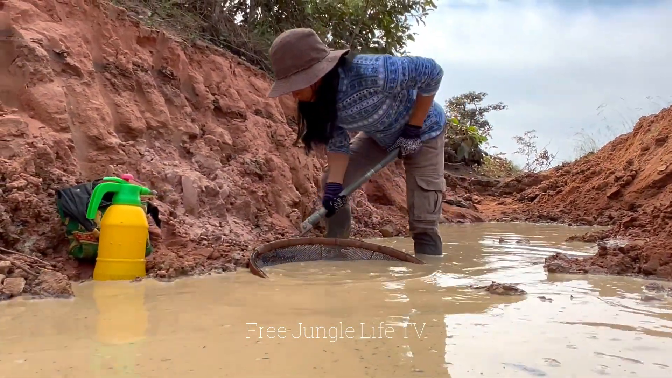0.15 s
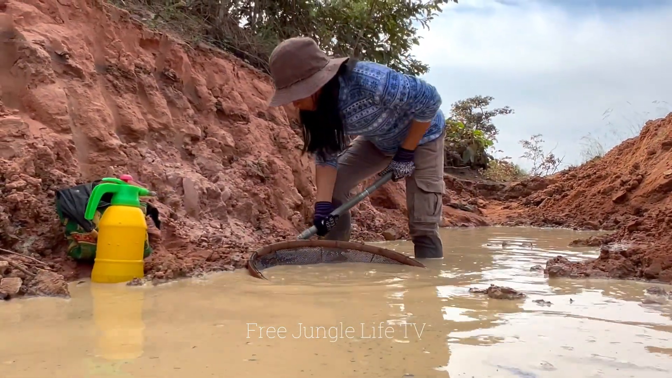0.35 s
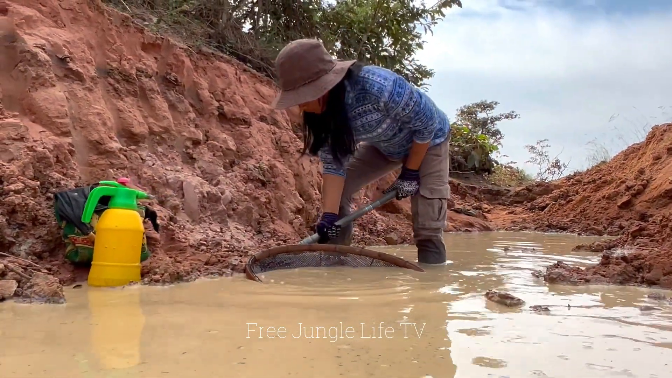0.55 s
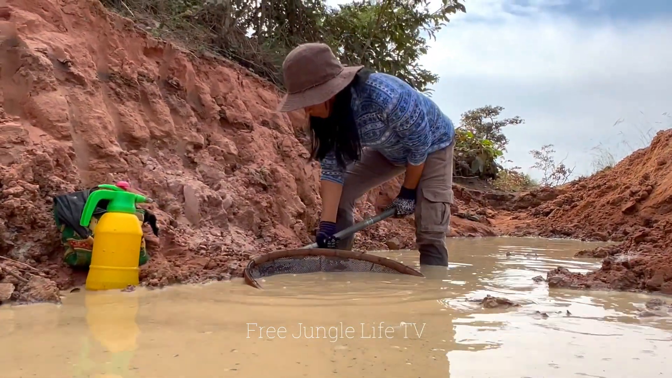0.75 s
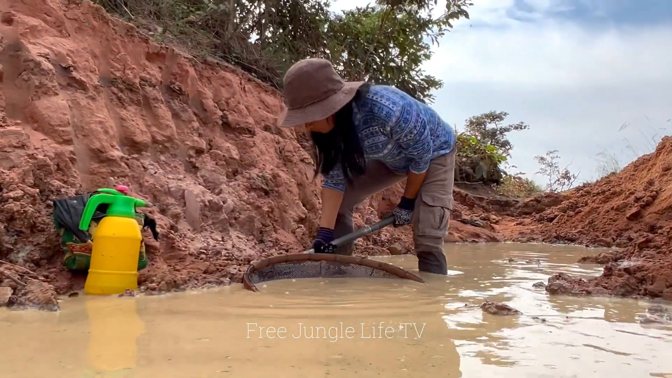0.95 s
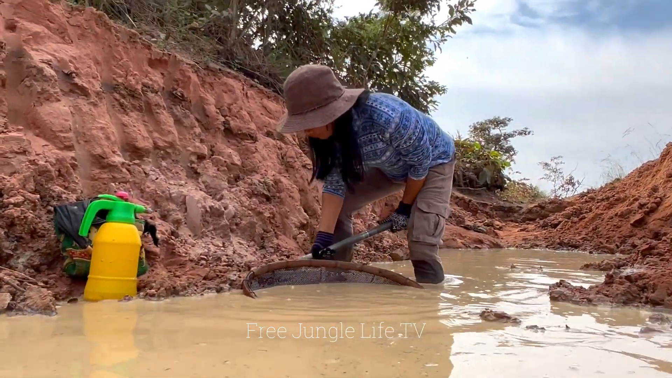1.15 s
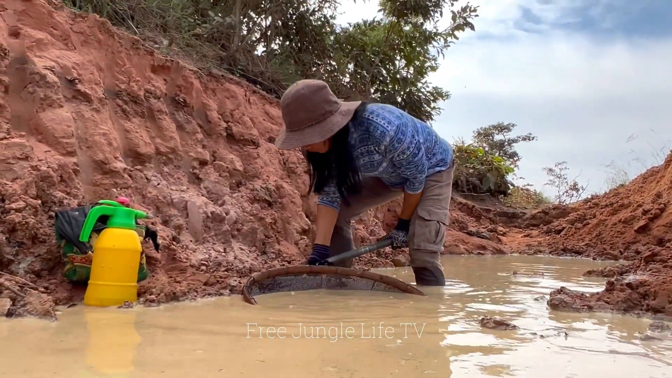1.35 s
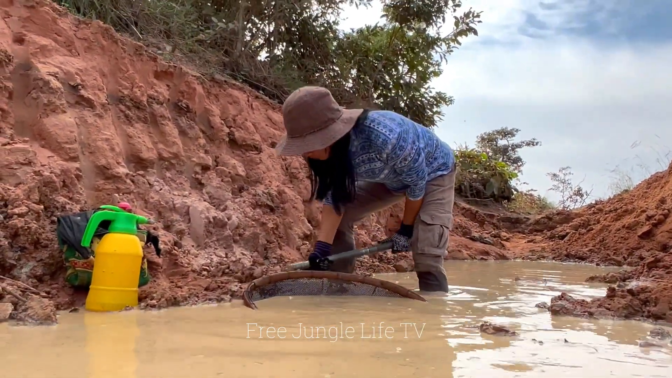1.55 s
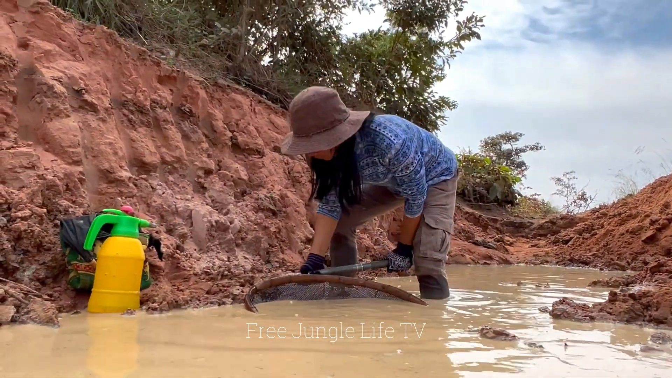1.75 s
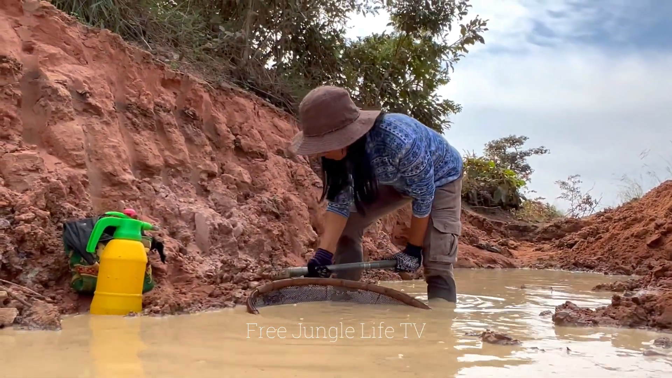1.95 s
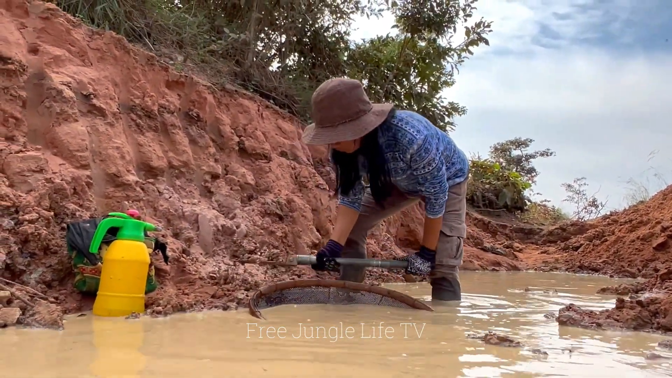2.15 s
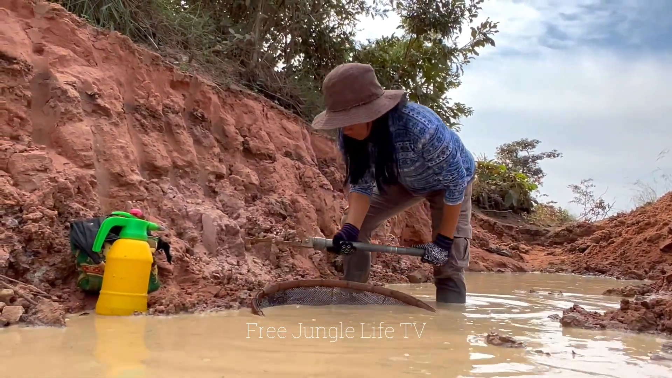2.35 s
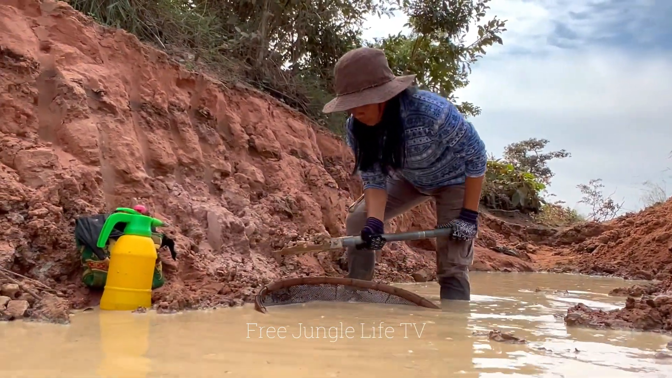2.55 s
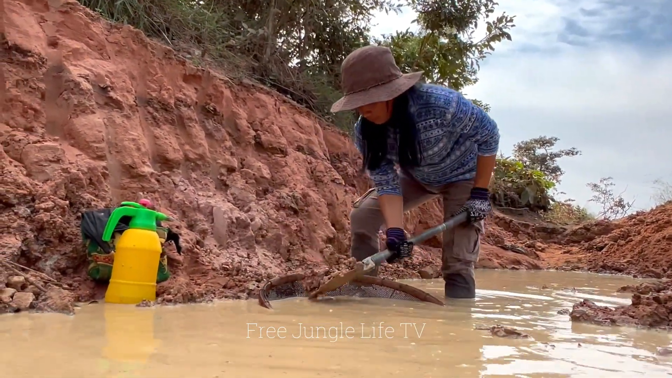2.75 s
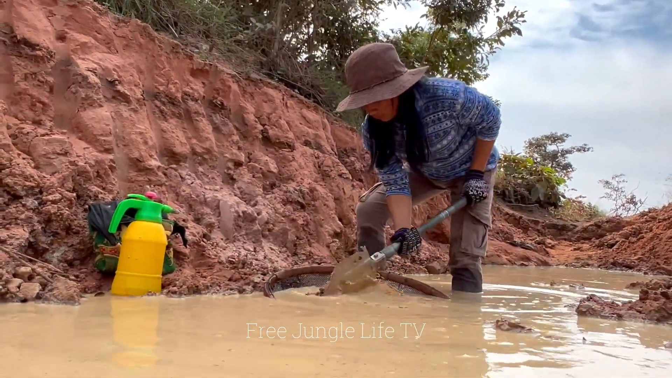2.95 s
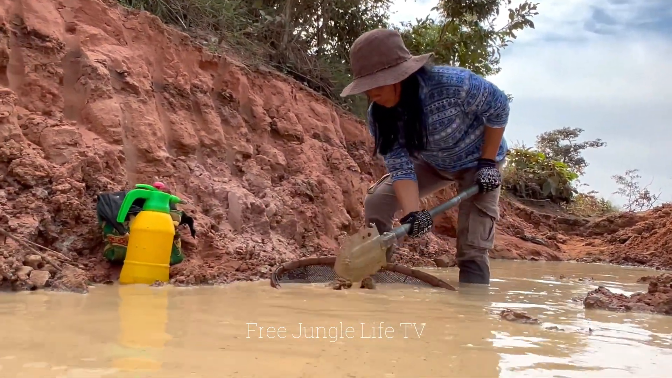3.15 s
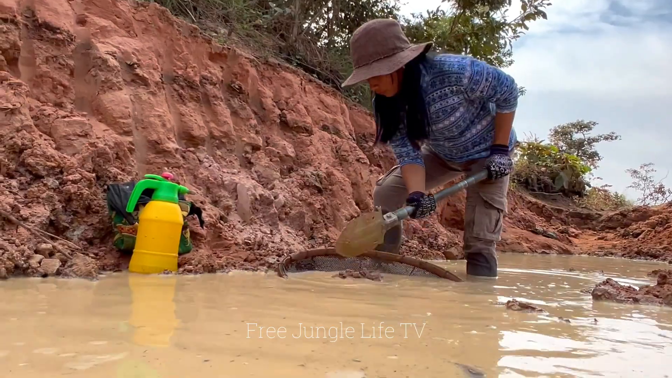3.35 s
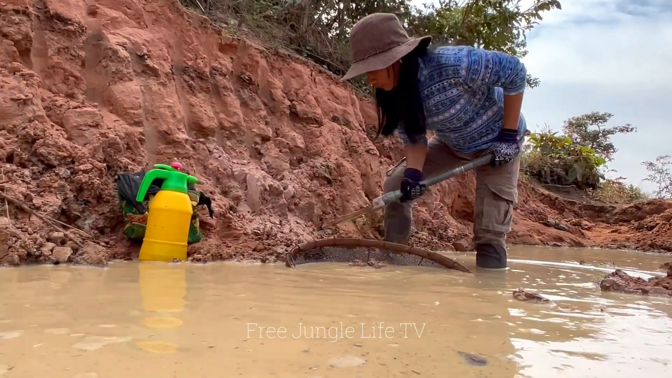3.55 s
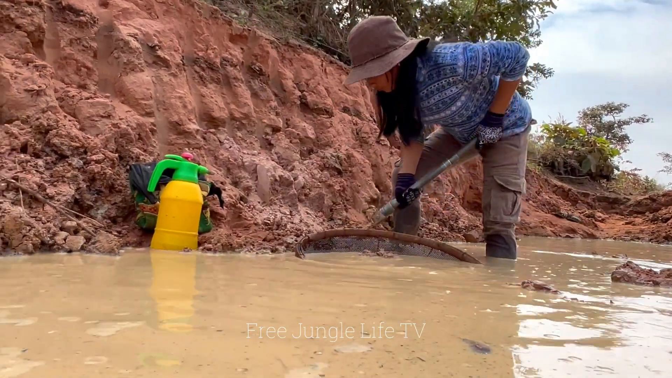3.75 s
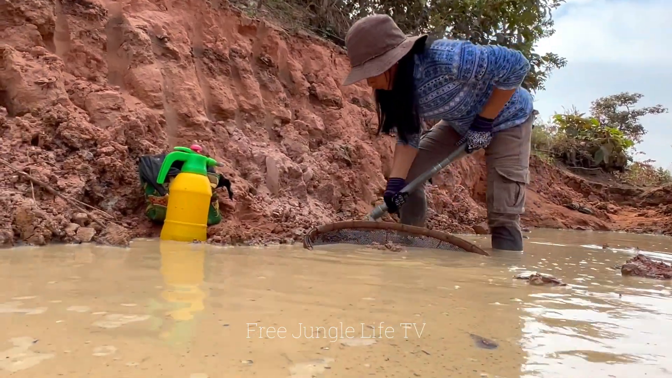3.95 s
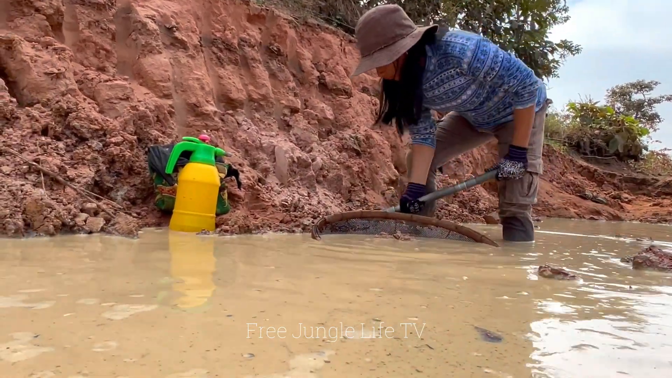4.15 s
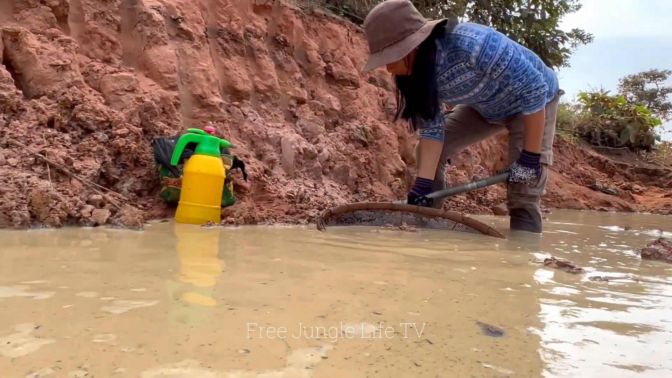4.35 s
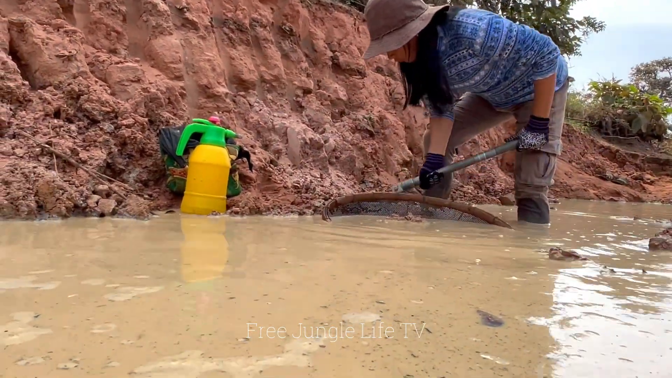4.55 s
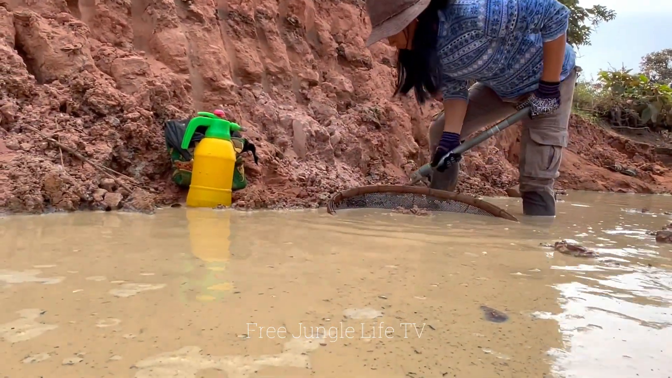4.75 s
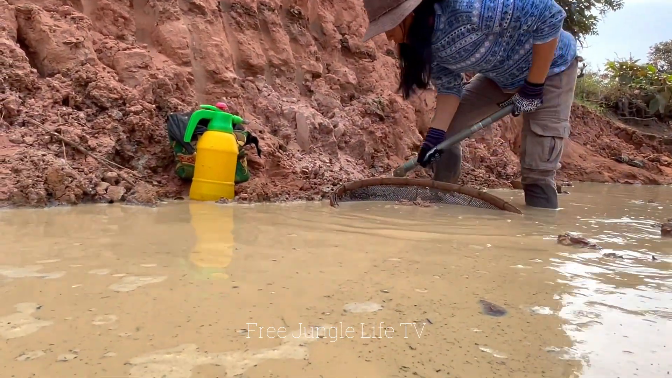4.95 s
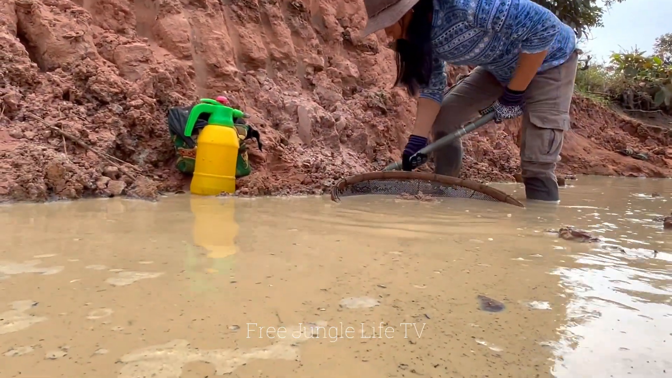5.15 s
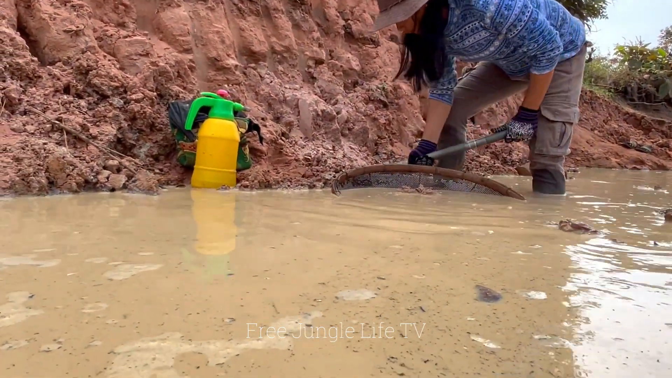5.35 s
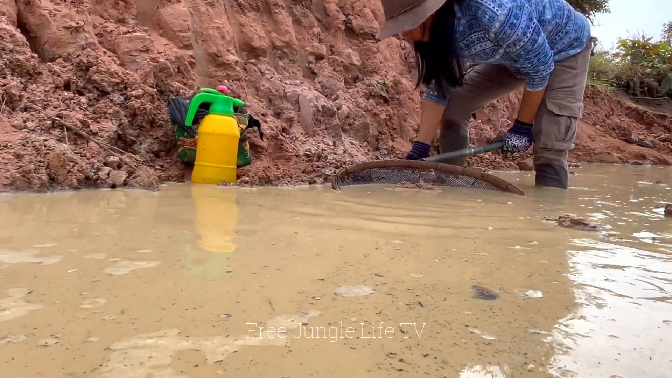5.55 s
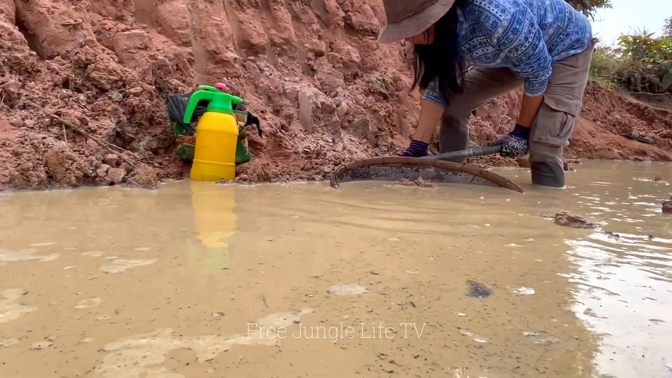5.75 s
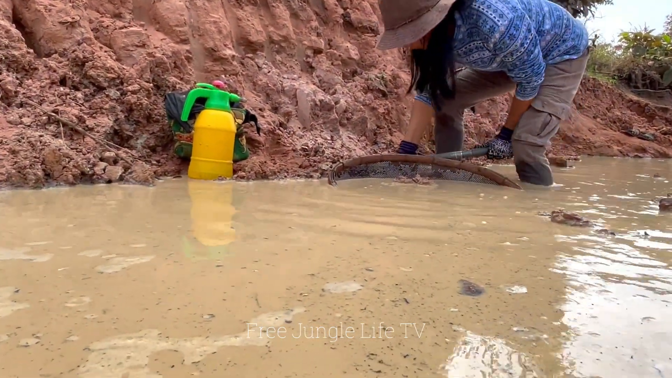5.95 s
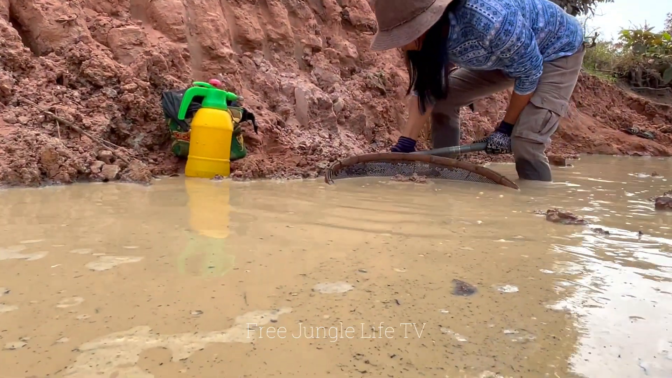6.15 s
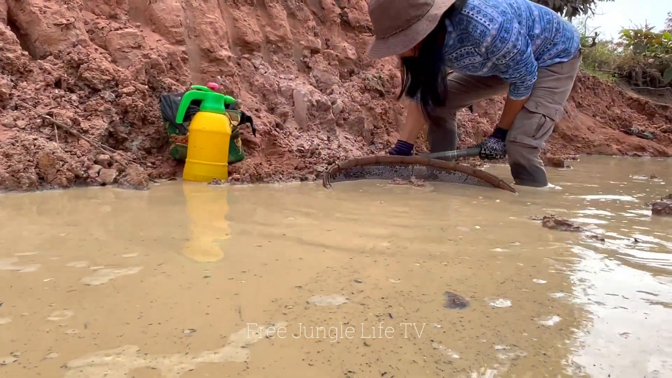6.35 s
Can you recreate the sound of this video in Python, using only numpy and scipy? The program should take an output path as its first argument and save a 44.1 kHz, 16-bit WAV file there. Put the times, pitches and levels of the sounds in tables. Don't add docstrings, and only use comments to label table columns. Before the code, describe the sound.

Wet gravel crunches under a steel shovel in a shallow outdoor pool. Strong scrapes and a sharp crack come first, then a lull of drips and light knocks, a spray-filled push, dull hollow knocks, a small metallic ring, and a final hard dig with grinding, stuttering stones. Water and bubbles move beneath. Heard by a phone a few metres off, slightly left, with close earthy reflections, faint wind and insects.

```python
import sys
import numpy as np
from scipy import signal
from scipy.fft import rfft, irfft, next_fast_len
from scipy.io import wavfile
from scipy.ndimage import uniform_filter1d, map_coordinates

SR = 44100
rng = np.random.default_rng(int(sys.argv[2]) if len(sys.argv) > 2 else 0)


def dump_mix(stems):
    frames = np.atleast_2d(stems).T
    limited = np.clip(frames, -1, 1)
    pcm = np.round(limited * 32767).astype(np.int16)
    wavfile.write(sys.argv[1], SR, pcm)


def invert_db(level):
    return 10 ** (np.asarray(level, dtype=float) / 20)


N = 281799

# time in seconds, flooded pitch in Hz, spray over grind in dB,
# hum over gravel in dB, moved water over grind in dB.
BLADE_STATE = [(0, 1100, -4, -14, -26), (.58, 1150, -7, -7, -19), (.66, 560, -6, -3, -17),
               (.94, 598, -8, -4, -25), (1.05, 698.5, -9, -8, -20), (1.75, 800, -4, -15, -25),
               (2.77, 1100, -9, -18, -16), (2.81, 1100, 3, -12, -27), (3.7, 1150, -5, -12, -28),
               (3.8, 850, -1, -22, -12), (4.15, 540, -3, -7, -13), (4.5, 762.4, -4, -8, -28),
               (4.7, 1102, -3, -14, -23), (5.02, 1000, -3, -22, -17), (5.28, 1248, -7, -8, -22),
               (5.4, 847.4, -6, -1, -24), (6.22, 950, -6, -5, -21), (6.3, 630, -11, -2, -24)]
# frequency in Hz, level in dB per Hz.
GRIND = [(260, -49), (450, -4.5), (730, -9.5), (1270, -5), (1480, -12), (1630, -2.5), (2600, -8.5),
         (3380, -10), (5720, -120)]
# frequency in Hz, level in dB per Hz.
SPRAY = [(1290, -21.5), (2200, -5.5), (3150, 0), (4680, -3), (6620, -6), (7280, -16), (9000, -19),
         (11700, -40), (19800, -120)]
# frequency in Hz, level in dB per Hz.
MIST = [(5000, -37), (7500, 0.5), (9000, -3), (12000, -2.5), (16000, -7), (16500, -38)]
# frequency in Hz, level in dB per Hz.
SLOSH = [(76, -64), (130, -10), (204, -1), (373, -5), (500, -12.5), (650, -42), (1100, -120)]


def strokes():
    pitch, lift_db, hum_db, moved_db = curves(BLADE_STATE)
    grind_db = effort()
    spray_db = grind_db + lift_db + 0.1 * (grind_db + 40)
    slosh_db = moved_db + 0.3 * (grind_db + 40)
    mist_db = -13.5 + 0.65 * lift_db
    steel_db = -14 + 0.5 * lift_db
    lapping_db, bubble_db = -75, -9

    jerk_db = jolts() + 0.8 * wobble(45) + 2.0 * wobble(110) + 1.6 * wobble(300)
    unevenness = np.clip(0.75 - 0.05 * lift_db, 0.5, 1.1)
    jerk = unit(invert_db(jerk_db) ** unevenness)

    hollow = hum(pitch, width_hz=230) + 0.3 * hum(1.95 * pitch, width_hz=300)
    stones = swarm(7000, 1408, spread=0.463, cycles=1.4, scatter_db=1.5, length=256)
    rubble = 0.71 * stones + 0.72 * coloured(patchy(2.5), GRIND)
    gravel = above(rubble, 0.75 * pitch, slope=3.75)
    grind = (invert_db(hum_db) * hollow + gravel) / np.sqrt(1 + invert_db(2 * hum_db))

    grit = (rng.random(N) < 0.05) * rng.standard_normal(N) * invert_db(3.4 * rng.standard_normal(N))
    grit = unit(grit)
    fizz = swarm(9000, 4200, spread=0.306, cycles=3.6, scatter_db=6, length=128)
    spray = unit(coloured(0.76 * grit + 0.5 * patchy(3.5), SPRAY) + 0.5 * fizz)
    steel = invert_db(steel_db + damping(np.arange(N) / SR)) * unit(filtered(grit, ring))
    mist = invert_db(mist_db) * coloured(0.41 * grit + 1.0 * patchy(3), MIST)

    water = unit(coloured(patchy(4.6), SLOSH) * invert_db(2.1 * wobble(30)))
    slosh = (invert_db(slosh_db) + invert_db(lapping_db - grind_db)) * water
    below = 0.9 * grind + slosh + invert_db(bubble_db) * bubbles(pitch)
    return jerk * (invert_db(grind_db - 3.0) * below + invert_db(spray_db - 3.0) * (spray + steel + mist))


# peak time in seconds, grind level in dB,
# rise and fall over 20 dB in seconds.
PUSHES = [(0.001, -42.5, .1, .075), (.2, -36.5, .095, .3), (.335, -23.5, .09, .065), (.926, -34, .17, .09),
          (1.01, -28, .07, .08), (1.109, -36, .15, .07), (1.243, -37, .11, .18), (1.33, -30, .1, .065),
          (1.53, -38, .09, .22), (1.934, -45.5, .35, .23), (2.163, -50.5, .07, .15), (2.972, -36, .12, .24),
          (3.13, -48, .2, .07), (3.247, -48.5, .18, .14), (3.386, -61, .3, .7), (3.895, -36, .05, .1),
          (3.995, -30, .14, .05), (4.342, -50, .03, .04), (4.72, -47.5, .08, .05), (4.87, -50, .04, .07),
          (5.25, -37, .09, .08), (5.476, -39.5, .16, .18), (5.595, -39, .15, .035), (5.75, -44, .12, .2),
          (5.875, -35.5, .08, .21), (6.136, -48, .08, .2), (6.298, -35, .11, .17)]
# start in seconds, grind level in dB, drag in seconds,
# fall over 20 dB in seconds.
STABS = [(.4, -44, .42, .1), (1.62, -44, .02, .05), (1.645, -27, .05, .055), (2.25, -61, .3, .4),
         (2.822, -51, .02, .05), (2.856, -43, .04, .1), (3.796, -39.5, .08, .1), (4.04, -45.5, .21, .1),
         (4.362, -40, .005, .035), (4.44, -34, .012, .03), (4.49, -62, .1, .1), (4.594, -50, .005, .04),
         (4.643, -46, .005, .04), (4.76, -58, .005, .04), (4.79, -52, .02, .05), (4.834, -45, .07, .04),
         (.34, -30, .03, .03), (5.006, -28, .01, .15), (5.02, -31, .128, .018), (6.22, -36, .005, .08)]


def effort():
    bite_s, ease_bend, rest_db = 0.006, 1.4, -72
    t = np.arange(0, N / SR, 0.001)
    moves = [(s, db, rise, 0, fall) for s, db, rise, fall in PUSHES]
    moves += [(s, db, bite_s, drag, fall) for s, db, drag, fall in STABS]
    s, db, rise, drag, fall = np.transpose(moves)[:, :, None]
    away = np.maximum(s - t, 0) / rise + np.maximum(t - s - drag, 0) / fall
    power = invert_db(2 * rest_db) + invert_db(2 * (db - 20 * away ** ease_bend)).sum(axis=0)
    return np.interp(np.arange(N) / SR, t, 10 * np.log10(power))


def hum(pitch, width_hz):
    turn = 2 * np.pi * np.cumsum(pitch) / SR
    return unit(wobble(width_hz) * np.cos(turn) + wobble(width_hz) * np.sin(turn))


def above(x, edge_hz, slope):
    hz, t, z = signal.stft(x, SR, nperseg=512)
    edge = np.interp(t, np.arange(N) / SR, edge_hz)
    cut = np.sqrt(1 + (edge / (hz[:, None] + 1)) ** slope)
    return unit(signal.istft(z / cut, SR, nperseg=512)[1][:N])


def bubbles(lowest_hz):
    when, step, size = rng.random((3, 500))
    pitch = lowest_hz[(when * N).astype(int)] * invert_db(11 * step)
    return unit(grains(when * N / SR, pitch, 3.5 / pitch, invert_db(14 * size), 0.12, length=1024))


# frequency in Hz, level in dB, time to die by 60 dB in seconds.
BLADE = [(1470, -23, 0.21), (1922, -11, 0.11), (2525, -3, 0.067), (2934, -15, 0.11), (3752, -4, 0.061),
         (4382, -15, 0.066), (5055, 0, 0.052), (5959, -4, 0.038), (6487, -14, 0.055), (7386, -11, 0.025),
         (8312, -19, 0.038)]


def ring(f):
    response = 0
    for k, (hz, db, t60) in enumerate(BLADE):
        width = np.log(1000) / np.pi / t60
        peak = 1j * f * width / (hz * hz - f * f + 1j * f * width)
        response = response + (-1) ** k * invert_db(db) * peak
    return response


def damping(s):
    return np.where((s > 4.55) & (s < 4.93), 6, -12)


# time in seconds, peak in dB, thud over peak in dB.
KNOCKS = [(0.2785, -19, -4), (0.9062, -38, 11), (0.918, -24.5, 5), (0.9832, -27, 1), (1.006, -22, 6),
          (1.3286, -22.5, 7.5), (2.1545, -31, -1.5), (2.2598, -27, -2), (2.2817, -24.5, 2),
          (2.593, -35.5, -5), (2.817, -25, -3), (2.9259, -23, -3), (3.1, -20, -4), (3.8901, -17.5, 6),
          (4.2235, -33, 8), (4.359, -16.5, 10.5), (4.4273, -37, 11), (4.4433, -25.5, 12), (4.591, -29, 1),
          (4.833, -30, 3.5), (5.0283, -32, 2), (5.0794, -27, -1), (5.4445, -23, 0), (6.0575, -30, -4),
          (6.2161, -20, -2)]
# time in seconds, peak in dB.
CRACKS = [(0.2942, -22), (0.3135, -5), (1.1013, -12.5), (1.6395, -12), (2.855, -18.5), (3.7913, -14),
          (3.8424, -26.5), (3.8677, -25), (4.6398, -24.5), (4.676, -32), (4.789, -26), (5.006, -12),
          (5.6545, -35), (6.303, -27)]


def knocks():
    crack, thud, steel = np.zeros((3, N + SR))
    t = np.arange(SR // 10) / SR
    hz, mode_db, t60 = np.transpose(BLADE)[:, :, None]
    start = 1 - np.exp(-t / 0.0007)
    modes = start * invert_db(mode_db - 60 * t / t60) * np.sin(2 * np.pi * hz * t)
    rattle = start * (invert_db(-60 * t / 0.0083) + 0.16 * invert_db(-60 * t / 0.024))

    # time, peak dB, then thud and ring in dB over the peak
    hits = [(s, db, thud_db, -21) for s, db, thud_db in KNOCKS]
    hits += [(s, db, -15, -20) for s, db in CRACKS]
    for s, db, thud_db, ring_db in hits:
        at = slice(round(s * SR), round(s * SR) + len(t))
        crack[at] += invert_db(db) * rattle * rng.standard_normal(len(t))
        thud[at] += invert_db(db + thud_db - 60 * t / 0.041) * start * rng.standard_normal(len(t))
        mix_db = 2.3 * rng.standard_normal(len(BLADE))
        steel[at] += invert_db(db + ring_db + damping(s) + mix_db) @ modes

    bright = filtered(crack[:N], lambda hz: invert_db(along(SPRAY, hz)) + invert_db(along(MIST, hz) - 18.5))
    dull = filtered(thud[:N], lambda hz: invert_db(along(GRIND, hz)))
    return invert_db(5) * bright + invert_db(0.5) * dull + steel[:N]


# time in seconds, peak in dB, pitch in Hz.
CATCHES = [(0.072, -44, 1180), (0.187, -34, 1040), (0.441, -31, 1170), (0.467, -34, 993),
           (0.485, -31, 1160), (0.547, -44, 982), (0.613, -42, 1230), (0.696, -37, 1080), (0.792, -41, 735),
           (0.824, -39, 600), (0.844, -40, 630), (0.957, -33, 1080), (0.972, -31, 1120), (1.073, -30, 681),
           (1.187, -40, 751), (1.2, -35, 1220), (1.242, -31, 991), (1.299, -27, 751), (1.464, -46, 1050),
           (1.477, -41, 697), (1.593, -32, 1080), (1.751, -36, 1080), (1.819, -44, 1150),
           (5.185, -39, 1290), (5.225, -33, 1220), (5.246, -35, 1270), (5.258, -32, 1290),
           (5.277, -31, 1140), (5.31, -41, 988), (5.317, -38, 1040), (5.364, -42, 972), (5.375, -40, 982),
           (5.39, -36, 894), (5.418, -34, 840), (5.445, -32, 875), (5.469, -30, 837), (5.489, -31, 1240),
           (5.517, -34, 972), (5.548, -33, 934), (5.573, -30, 926), (5.597, -31, 904), (5.627, -45, 918),
           (5.652, -48, 912), (5.682, -43, 945), (5.704, -37, 939), (5.784, -41, 1000), (5.812, -40, 945),
           (5.884, -31, 1100), (5.919, -28, 1030), (5.948, -28, 1060), (5.974, -38, 923), (6.001, -42, 988),
           (6.164, -41, 1220)]


def jolts():
    kicks = np.zeros(N)
    u = np.arange(SR // 20) / SR / 0.004
    kicks[(np.transpose(CATCHES)[0] * SR).astype(int)] = 3.5
    return signal.fftconvolve(kicks, u * np.exp(1 - u))[:N]


# time in seconds, pitch in Hz, peak in dB.
PLINKS = [(0.296, 1150, -22), (0.318, 3060, -17), (0.353, 1000, -17), (0.467, 980, -32), (1.323, 1220, -28),
          (1.639, 2880, -18), (2.283, 1200, -37), (2.853, 1036, -26.5), (3.821, 510, -35),
          (3.89, 2670, -26), (3.993, 1040, -27), (4.21, 984, -40), (4.361, 762, -16), (4.365, 1880, -24),
          (4.445, 764, -15.5), (4.59, 1840, -41), (4.591, 906, -36), (4.668, 1200, -47), (4.711, 1640, -42),
          (4.724, 950, -42), (4.833, 1250, -40), (4.876, 1250, -42), (5.006, 943, -16.5), (5.01, 1330, -25),
          (5.066, 1650, -21), (5.869, 1016, -28), (6.063, 1117, -37), (6.22, 930, -27)]
# time in seconds, pitch in Hz, peak in dB.
POCKETS = [(0.316, 1153, -21.5), (0.895, 578, -30.5), (0.928, 584, -30), (1.0, 705, -27), (1.045, 697, -28),
           (1.333, 1520, -29.5), (1.342, 1245, -27), (1.518, 1490, -33), (1.638, 2366, -22.5),
           (1.642, 702, -28), (1.684, 845, -29.5), (3.041, 1336, -33), (3.117, 983, -35),
           (3.139, 1280, -38.5), (3.888, 2210, -24.5), (3.889, 1742, -20), (3.962, 728, -26.5),
           (3.986, 659, -25), (4.36, 2505, -27.5), (5.005, 2217, -17), (5.006, 2950, -23),
           (5.035, 2620, -24), (5.118, 1283, -19), (5.223, 1271, -37.5), (5.729, 888, -38),
           (6.131, 880, -43), (6.284, 626, -26)]
# time in seconds, pitch in Hz, peak in dB.
FLECKS = [(.232, 1950, -32), (.243, 1950, -28), (.235, 3250, -34), (.279, 1850, -30), (.314, 5100, -24),
          (.318, 6500, -30), (3.1, 2480, -33), (3.8, 2900, -33), (3.833, 2050, -32), (3.866, 4000, -32),
          (3.872, 5900, -36), (4.078, 1800, -41), (4.078, 3100, -43), (4.093, 1850, -39),
          (4.103, 2550, -41), (4.14, 4200, -41), (4.146, 2650, -43), (4.168, 4600, -43), (4.177, 3150, -39),
          (4.2, 2200, -46), (4.224, 2110, -33), (4.226, 2600, -36), (4.226, 4200, -40), (4.248, 2500, -41),
          (4.265, 2100, -42), (4.33, 2000, -46), (4.341, 2060, -43), (4.641, 6490, -35), (5.445, 3900, -37),
          (5.47, 3900, -38), (5.87, 3800, -36)]
# time in seconds, pitch in Hz, peak in dB,
# length in seconds, pitch rise as a share.
GULPS = [(.336, 1100, -23, .01, .01), (.346, 1200, -24, .006, .01), (.805, 120, -43, .02, .01),
         (2.419, 800, -49, .008, .05), (3.921, 900, -33, .015, .02), (4.209, 700, -40, .012, .02),
         (4.426, 780, -34, .012, .01), (4.457, 760, -20, .009, .01), (4.9, 1470, -54, .05, .005),
         (5.052, 1650, -19, .005, .01), (5.078, 1660, -20, .007, .01), (5.096, 1650, -25, .006, -.05),
         (5.143, 1380, -21, .008, .05), (6.305, 700, -32, .03, .3), (6.3, 1150, -36, .03, .2)]


def notes():
    out = 0
    for table, cycles, gain_db in ((PLINKS, 2.1, -1.5), (POCKETS, 4.6, -1.5), (FLECKS, 6, -5)):
        s, hz, db = np.transpose(table)
        out = out + grains(s - 0.001, hz, cycles / hz, invert_db(db + gain_db), 0.0052, length=2048)

    s, db, hz = np.transpose(CATCHES)
    for ratio, gain_db in ((1, -6), (1.97, -13)):
        life = 2.3 / hz / np.sqrt(ratio)
        out = out + grains(s - 0.001, ratio * hz, life, invert_db(db + gain_db), 0.01, length=1024)

    s, hz, db, length, rise = np.transpose(GULPS)
    return out + grains(s - 0.001, hz, 0.3 * length, invert_db(db), rise[:, None], length=4096)


# time in seconds, peak in dB.
DRIPS = [(1.7519, -34), (1.9054, -44), (2.0265, -34), (2.0996, -57), (2.1322, -34.5), (2.166, -32),
         (2.379, -47), (2.3916, -39.5), (2.4967, -52), (2.6126, -39), (3.2047, -33), (3.2328, -30.5),
         (3.2822, -33.5), (3.389, -42), (3.4258, -48), (3.477, -48), (3.6007, -51), (3.748, -55),
         (4.1615, -37), (4.169, -43), (4.177, -43), (4.303, -50), (4.7105, -40), (4.7245, -42),
         (4.7575, -46), (5.166, -36), (5.282, -38), (5.3547, -35), (5.3885, -32), (5.4136, -31.5),
         (5.7284, -36), (5.698, -42), (5.812, -40), (6.02, -40), (6.07, -38), (6.082, -44), (6.278, -38),
         (2.828, -38)]


def drips():
    ticks = np.zeros(N + SR)
    t = np.arange(SR // 100) / SR
    for s, db in DRIPS:
        tick = invert_db(db + 1.5 - 60 * t / 0.014) * rng.standard_normal(len(t))
        ticks[round(s * SR):][:len(t)] += tick
    return filtered(ticks[:N], lambda hz: invert_db(along(SPRAY, hz)) + invert_db(along(MIST, hz) - 19.5))


# time in seconds, lead in samples, left over right in dB.
LEAD = [(0, 3, 5.5), (.7, 3.5, 3.5), (1.2, 3.5, 3), (1.7, 3.5, 1), (2.4, 3.86, 3), (3.2, 1.5, 3),
        (3.8, 0.44, 2), (5, 0.58, 1.2), (6.4, 1.5, 6)]
# frequency in Hz, left over right in dB.
PORTS = [(200, -4), (1300, 0.5), (2400, -3), (8100, -1.5), (15000, -5.5)]


def ports(x):
    lead, pan_db = curves(LEAD)
    pair = []
    for side in (1, -1):
        shifted = map_coordinates(x, [np.arange(N) + side * lead / 2], order=3)
        pair.append(invert_db(side * pan_db / 2) * shifted)
    return filtered(np.array(pair), lambda hz: invert_db(np.outer([0.5, -0.5], along(PORTS, hz))))


# frequency in Hz, time to die by 60 dB in seconds, level in dB.
BANK = [(197.5, 0.14, -14), (1000, 0.04, -5), (4170, 0.042, -5.5), (9700, 0.033, -2)]


def bank(x, size=8192):
    count = N // size + 2
    hz, t, z = signal.stft(rng.standard_normal((2, count, SR // 10)), SR, nperseg=128)
    t60 = along([(row[0], row[1]) for row in BANK], hz)[:, None]
    db = along([(row[0], row[2]) for row in BANK], hz)[:, None]
    fade = invert_db(-60 * t / t60)
    fade = fade / np.sqrt(np.sum(fade ** 2, 1, keepdims=True) * 64)
    tail = signal.istft(z * fade * invert_db(db), SR, nperseg=128)[1]
    pieces = np.pad(x, (40, count * size - N - 40)).reshape(1, count, size)
    wet = signal.fftconvolve(pieces, tail, axes=2)
    out = np.pad(wet, ((0, 0), (0, 0), (0, 2 * size - wet.shape[2])))
    joined = out[..., :size] + np.roll(out[..., size:], 1, axis=1)
    return joined.reshape(2, -1)[:, :N]


# time in seconds, rumble in dB.
WIND = [(0.0, -69), (0.19, -75), (0.34, -58), (1.19, -67), (1.9, -61), (1.97, -77), (2.33, -61),
        (2.35, -73), (3.2, -68), (3.74, -80), (3.83, -61), (4.22, -67), (6.16, -69), (6.39, -65)]
# frequency in Hz, level in dB per Hz.
AIR = [(15, -38), (25, -21), (76, 0.5), (265, 7), (1030, -2), (3310, -6.5), (6340, 6), (8790, -12.5),
       (10100, -56), (11200, -63), (13900, -80), (15100, -63), (16400, -44)]


def air():
    shared, left, right = (coloured(patchy(3), AIR) for _ in range(3))
    hiss = invert_db(-70.5 + 1.5 * wobble(6)) * unit(shared + 0.5 * np.array([left, right]))
    gust = invert_db(curves(WIND)[0] + 3.2 * wobble(11))
    rumble = [(20, -48), (45, 0), (80, 5), (130, -5.5), (200, -43.5)]  # Hz, dB
    low = filtered(rng.standard_normal((3, N)), lambda hz: invert_db(along(rumble, hz)))
    return hiss + gust * unit(low[0] + 0.87 * low[1:])


def unit(x):
    return x / np.sqrt(np.mean(x ** 2) + 1e-20)


def along(points, hz):
    f, v = np.transpose(points)
    return np.interp(np.log(hz + 1), np.log(f + 1), v)


def curves(rows):
    s, *cols = np.transpose(rows)
    return [np.interp(np.arange(N) / SR, s, c) for c in cols]


def wobble(rate):
    return map_coordinates(rng.standard_normal(4000), [np.arange(N) * rate / SR], order=2)


def filtered(x, response):
    m = next_fast_len(N + 8192)
    return irfft(rfft(x, m) * response(np.fft.rfftfreq(m, 1 / SR)), m)[..., :N]


def coloured(x, spectrum):
    return unit(filtered(x, lambda hz: invert_db(along(spectrum, hz))))


def patchy(depth_db):
    z = signal.stft(rng.standard_normal(N), nperseg=256)[2]
    field = uniform_filter1d(rng.standard_normal(z.shape), size=3, axis=0)
    field = uniform_filter1d(field, size=5, axis=1)
    gain = invert_db(depth_db * np.clip(unit(field), -2, 2))
    return unit(signal.istft(z * gain, nperseg=256)[1][:N])


def grains(start, hz, life, size, rise, length=1024):
    t = np.arange(length) / SR
    u = t / life[:, None]
    climb = 1 + rise * np.minimum(u, 2) / 2
    wave = np.sin(2 * np.pi * hz[:, None] * t * climb) * u * np.exp(1 - u)
    at = (start * SR).astype(int)[:, None] + np.arange(length)
    return np.bincount(at.ravel(), (size[:, None] * wave).ravel(), N + SR)[:N]


def swarm(count, hz, spread, cycles, scatter_db, length):
    when = rng.random(count) * N / SR
    step, size = rng.standard_normal((2, count))
    pitch = hz * np.exp(spread * np.clip(step, -2, 2))
    level = invert_db(scatter_db * np.clip(size, -2, 2))
    return unit(grains(when, pitch, cycles / pitch, level, 0.089, length=length))


def scene():
    digger = strokes() + knocks() + notes() + drips()
    return invert_db(0.93) * ports(digger) + invert_db(4.3) * bank(digger) + air()


# frequency in Hz, width in Hz, depth in dB.
HOLES = [(10300, 450, -34), (13900, 480, -36)]


def phone_response(f):
    dip_db = sum(db * np.exp(-((f - hz) / width) ** 4) for hz, width, db in HOLES)
    return invert_db(dip_db) / (1 + (f / 15750) ** 80)


def low_pass(x):
    return signal.sosfilt(signal.butter(12, 16960, fs=SR, output="sos"), x)


def record(dry):
    mix = filtered(dry, phone_response)
    return low_pass(mix)


dry = scene()
out = record(dry)
dump_mix(out)
```